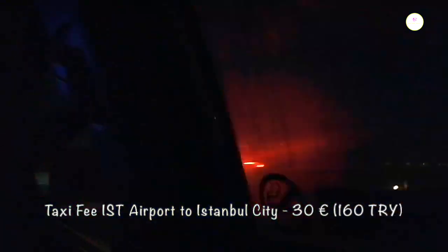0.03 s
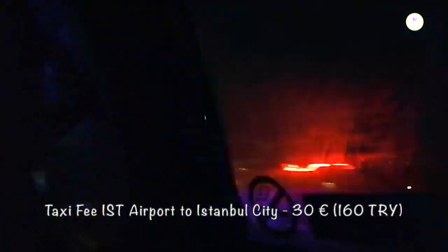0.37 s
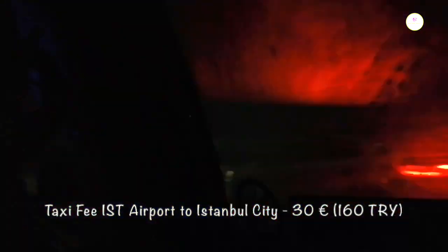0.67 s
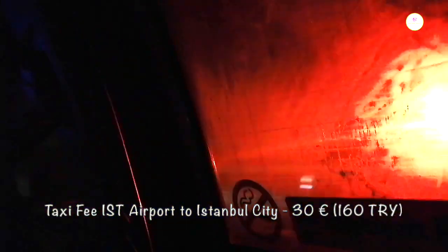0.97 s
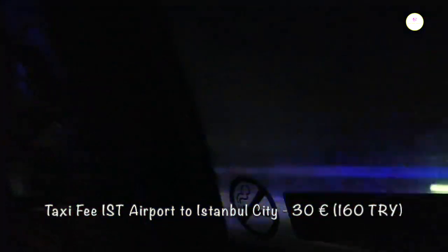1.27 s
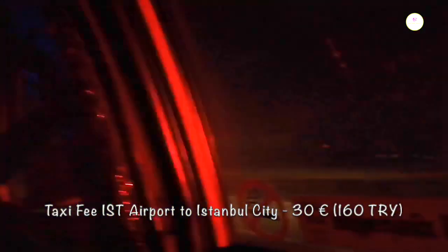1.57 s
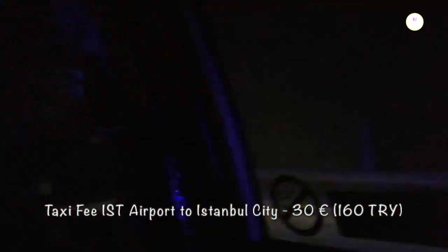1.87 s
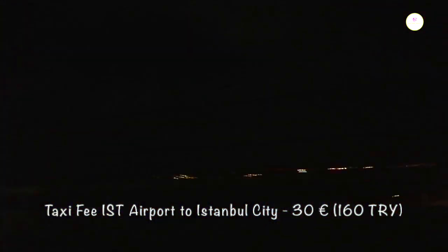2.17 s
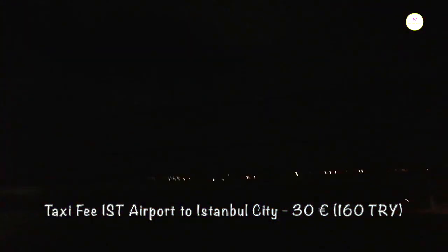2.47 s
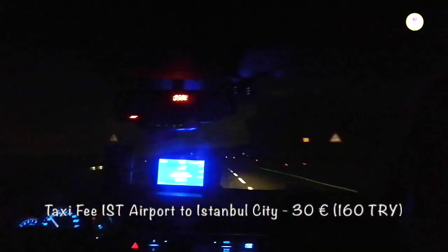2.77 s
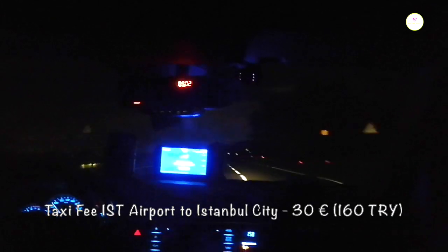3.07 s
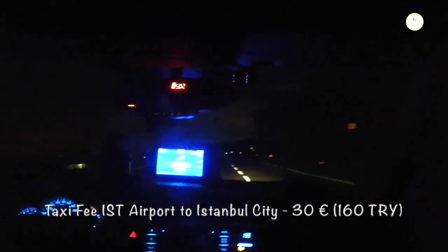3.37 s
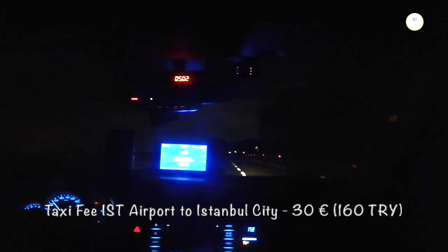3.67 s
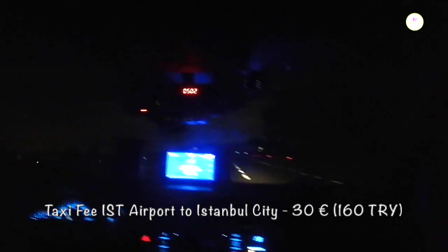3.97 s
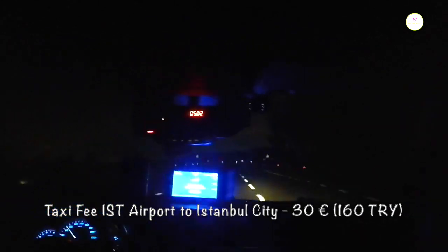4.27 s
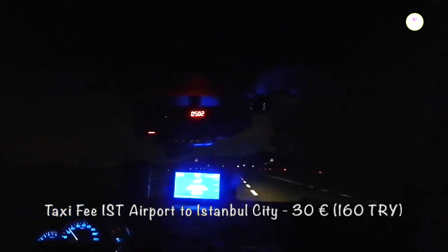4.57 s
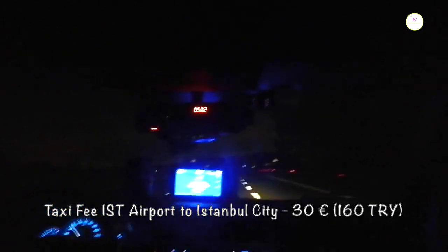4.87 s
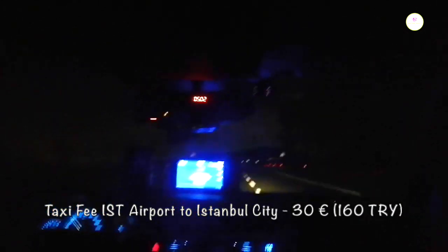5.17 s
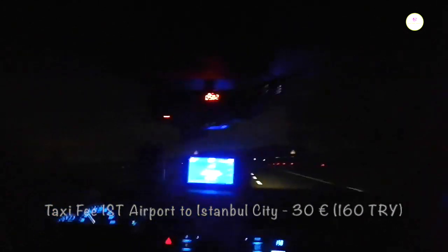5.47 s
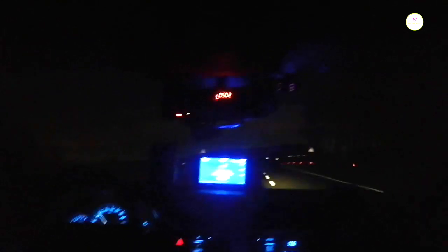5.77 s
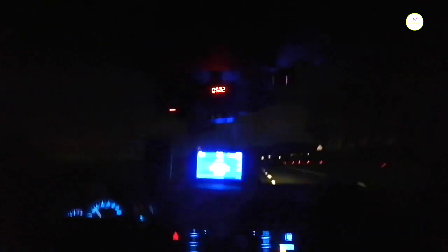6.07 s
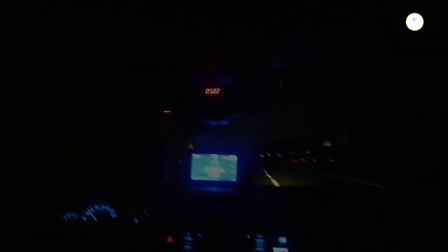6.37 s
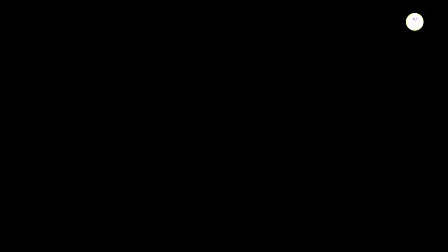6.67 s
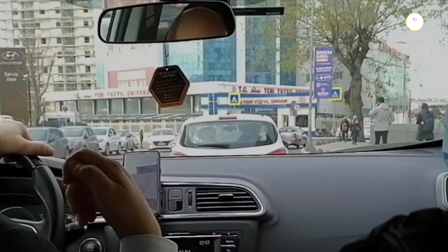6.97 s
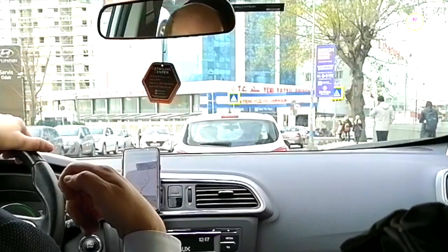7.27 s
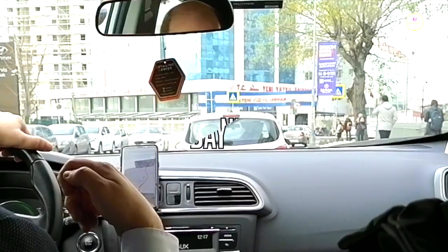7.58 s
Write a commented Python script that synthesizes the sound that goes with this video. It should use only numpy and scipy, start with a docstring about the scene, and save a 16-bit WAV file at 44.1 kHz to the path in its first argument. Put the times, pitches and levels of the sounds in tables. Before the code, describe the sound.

Inside a taxi cruising on a motorway, a low engine boom, road rumble and tyre roar run steadily, with small plastic ticks and faint rustles close by. The microphone starts beside a side window, where wind briefly rushes along the door seal. With two dry clicks it turns forward and the tyres sound duller. Gusts make a window gap sing faintly, then everything fades out.

```python
"""Inside a taxi cruising on a motorway at night. From the start the engine booms, the road rumbles
through the body and the tyres roar, with small plastic ticks and rustles close by. The microphone is
first by a side window, where wind rushes along the door seal at about 2 s. At 2.7 s, with two dry
clicks, it turns to face the dashboard and the tyres sound duller. Side gusts then make a window gap
sing faintly. From 6.5 s the sound fades out."""
import sys
import numpy as np
from scipy.fft import rfft, irfft, next_fast_len
from scipy.io import wavfile
from scipy.ndimage import uniform_filter1d, minimum_filter1d, map_coordinates

SR = 44100
rng = np.random.default_rng(int(sys.argv[2]) if len(sys.argv) > 2 else 0)


def put_to_file(sound):
    """Save the sound as 16-bit audio at rate SR, in the file named by the first command-line argument."""
    columns = np.atleast_2d(sound).T  # one column per channel
    safe = np.clip(columns, -1, 1)
    whole_steps = np.round(safe * 32767)
    wavfile.write(sys.argv[1], SR, whole_steps.astype(np.int16))


N = 340881

TURN_S, FADE_START_S = 2.70, 6.528
# How alike left and right sound by the window: pitch_hz, likeness (1 the same, -1 opposite)
LIKENESS_SIDE = [(60, 0.99), (160, 0.93), (350, -0.8), (520, 0.43), (680, .55), (950, 0.47), (1300, -.4),
                 (1800, -0.32), (2500, -0.1), (3200, -0.051), (5000, 0.45)]
# The same when facing forward: pitch_hz, likeness
LIKENESS_FRONT = [(60, 0.96), (130, 0.91), (290, 0.86), (600, 0.44), (800, 0), (1050, -0.4), (1600, -.4),
                  (2400, 0.47), (3400, -0.096), (5000, 0.13)]


def engine(main_waver_db=1.66, other_waver_db=3, level_db=-0.17):
    """The firing cylinders boom in the cabin as a few wavering tones that follow the load."""
    # How fast the cylinders fire: time_s, rate_hz
    firing_rate = [(0, 68.64), (.5, 66.96), (2.65, 68.75), (2.8, 71.77), (6.9, 70.6)]
    # The boom as the engine works more or less hard: time_s, level_db
    boom_levels = [(0, -19), (.2, -13.5), (.8, -18), (1.2, -13.5), (2.0, -16), (2.25, -19), (2.75, -19.5),
                   (3.2, -16), (4.05, -19.5), (4.5, -13.5), (4.95, -17.5), (5.85, -17), (6.5, -18)]
    # The engine's tones: multiple (of the firing rate), side_level_db, front_level_db
    tones = [(.5, -7.5, -19.5), (1, 0, 0.5), (2, -10, -12.5), (3, -25, -22.5), (3.5, -30.5, -23),
             (4, -35.5, -26)]
    phase = 2 * np.pi * np.cumsum(curves(firing_rate)[0]) / SR
    boom_db, = curves(boom_levels)
    front = facing_forward()
    hum = np.zeros(N)
    for multiple, side_db, front_db in tones:
        db = side_db + front * (front_db - side_db)
        waver_db = main_waver_db if multiple == 1 else other_waver_db
        drift = rng.uniform(0, 2 * np.pi) + 0.19 * multiple * wobble(5)
        hum += amp(db + waver_db * wobble(7)) * np.sqrt(2) * np.sin(multiple * phase + drift)
    return filtered(hum * amp(boom_db + level_db), balance)


def road(shake_db=1.5, drone_db=0.47, cabin_db=-7, waver_db=1.0, dip_length_s=0.16):
    """Uneven asphalt shakes the body, makes its panels drone and rings the cabin air; dips heave it."""
    # How rough the asphalt is: time_s, shake_level_db, drone_level_db
    roughness = [(0, -24, -18), (1, -20.5, -18.5), (2.6, -22.5, -17), (2.8, -19, -20), (3.45, -20, -17.5),
                 (3.95, -23, -20.5), (4.7, -21, -19), (5.45, -17.5, -22), (6.5, -22.5, -22.5)]
    # Dips in the road: middle_s, level_db
    dips = [(.84, -18.5), (1.73, -12.5), (1.98, -16.5), (2.33, -14), (4.85, -16.5), (5.47, -16)]
    # The deep shake of the body: pitch_hz, level_db
    shake_colour = [(10, -21), (18, -5.5), (27, -8.5), (34, -2), (40, -8.5), (50, -1), (58, -4.5),
                    (66, -8.5)]
    # The drone of the panels: pitch_hz, level_db
    drone_colour = [(50, -35), (68, -5), (85, 3), (100, -1), (112, -3.5), (125, -2.5), (160, -4.5),
                    (192, -12.5), (225, -11.5), (255, -14), (290, -15.5), (370, -22.5), (480, -31),
                    (700, -60)]
    # Booms of the air in the cabin and in the tyres: pitch_hz, width_hz, level_db
    air_booms = [(137.35, 8.5, -2.5), (212.9, 6.8, -12.5)]
    body_db, panel_db = curves(roughness)
    heave = sum(amp(db) * swell(s, dip_length_s) for s, db in dips)
    shake = np.hypot(amp(body_db), heave) * amp(shake_db) * noise(colour(shake_colour))
    drone = amp(drone_db) * noise(colour(drone_colour))
    cabin = amp(cabin_db) * noise(resonances(air_booms))
    return shake + amp(panel_db + waver_db * wobble(22)) * (drone + cabin)


def tyres(level_db=-40, side_db=0.45, front_db=2.5, glass_db=-4.5, sway_db=0.67, grain_db=0.83):
    """Rolling tyres roar: bright and ringing beside the glass, duller facing forward."""
    # The roar by the window: pitch_hz, level_db
    side_colour = [(220, -29.5), (380, -4.5), (515, -7), (647, -5.5), (836, -7.5), (962, -6.5),
                   (1090, -12.5), (1290, -7.5), (1900, -13.5), (2470, -46.5), (4180, -120)]
    # The roar facing forward: pitch_hz, level_db
    front_colour = [(220, -27), (380, -7), (471, -1.5), (605, -9), (660, -3.5), (792, -9.5), (906, -9),
                    (1110, -15.5), (1210, -13), (1540, -19), (1750, -16.5), (1900, -21), (2470, -49),
                    (4180, -120)]
    # Where the window glass rings: pitch_hz, width_hz, level_db
    glass_rings = [(645, 40, 0.5), (975, 100, -1.5), (1300, 75, -1.5), (1529, 83, -1.5), (2246, 160, -12.5)]
    roar_db = level_db + sway_db * wobble(5.3)
    side = amp(side_db) * noise(colour(side_colour), LIKENESS_SIDE)
    side += amp(glass_db) * noise(resonances(glass_rings), LIKENESS_SIDE)
    front = amp(front_db) * noise(colour(front_colour))
    share = facing_forward()
    roar = np.sqrt(1 - share) * side + np.sqrt(share) * front
    return amp(roar_db + grain_db * wobble(25)) * roar


def wind(level_db=-1, eddy_db=0.77):
    """Air streams over the body, and side gusts make a window gap sing faintly."""
    # How strong the stream of air is: time_s, level_db
    air_levels = [(.1, -51.5), (.55, -48), (1.05, -48), (1.6, -50), (4.2, -52.7), (5.25, -51), (6.3, -49.5)]
    # The sound of that stream: pitch_hz, level_db
    air_colour = [(1400, -17.5), (1650, -9), (1790, 0.5), (1950, -5.5), (2100, 1), (2350, -3), (2550, -5),
                  (2800, -8), (3050, -8), (3400, -15), (3800, -21.5), (4400, -30)]
    # Side gusts: middle_s, length_s, level_db
    gusts = [(3.33, 0.33, -52), (3.98, .2, -51.5), (4.95, 0.27, -50.5)]
    # Where the gap sings: pitch_hz, width_hz, level_db
    gap_rings = [(1770, 70, 0), (2200, 370, -11)]
    air_db, = curves(air_levels)
    stream = amp(air_db + level_db + eddy_db * wobble(12)) * noise(colour(air_colour))
    blowing = sum(amp(db) * swell(s, length_s) for s, length_s, db in gusts)
    return stream + blowing * noise(resonances(gap_rings))


def door_seal(start_s=2.06, rise_s=0.016, hold_s=0.59, level_db=-39, flutter_db=1.5):
    """Wind rushes along the door seal for a moment, fluttering and weakening, then dies away."""
    # Where the air rings at the seal: pitch_hz, width_hz, level_db
    seal_rings = [(1477, 140, 2.5), (1774, 49, -5), (2210, 370, -3.5), (2490, 150, -14), (3020, 720, -14.5)]
    rush = np.zeros((2, N))
    for hz, width_hz, db in seal_rings:
        flutter = amp(db + flutter_db * wobble(20))
        rush += flutter * noise(resonances([(hz, width_hz, 0)]), LIKENESS_SIDE)
    sag_db = 3.5 * since(start_s)
    release_db = 60 * np.maximum(since(start_s + hold_s), 0)
    return ramp(start_s, rise_s) * amp(level_db - sag_db - release_db) * unit(rush)


def ticks(level_db=-5.5, rise_s=0.0011, chatter_db=2.5, left_shift_db=2):
    """Plastic sticks and slips: each tick or scrape is a short, chattering burst."""
    # Ticks and scrapes: start_s, level_db, decay_s (time to fall 60 dB), left_minus_right_db
    clear_ticks = [(.233, -46, .08, -2), (1.3953, -26.5, .022, 3), (1.806, -45, .04, -1.5),
                   (1.849, -31, .07, -6), (1.871, -43, .04, -2), (1.898, -42.5, .02, -5.5),
                   (2.776, -40, 0.027, -2.5), (2.934, -42.5, 0.059, -3), (3.128, -43.5, 0.056, -3),
                   (3.4619, -39, .025, -10.5), (3.519, -43, .03, -3.5), (3.547, -45.5, .04, -5.5),
                   (3.848, -47, .04, -2), (4.702, -43.5, .04, -2.5), (4.865, -45.5, .06, -8),
                   (5.091, -42.5, .03, -5), (5.427, -44, .04, -2.5), (5.993, -42.5, .06, -4),
                   (6.016, -44.5, 0.092, -1), (6.160, -44.5, .06, -3.5), (6.258, -46, .08, -3),
                   (6.453, -45.5, .05, -4), (6.579, -41.5, .035, -3)]
    faint_ticks = [(s, -51, .04, -2) for s in rng.uniform(TURN_S, FADE_START_S, size=8)]
    t = np.arange(SR // 4) / SR
    loudness = np.zeros((2, N))
    for start_s, db, decay_s, left_db in [*clear_ticks, *faint_ticks]:
        burst = amp(db) * np.exp(-np.log(1000) * t / decay_s) * (1 - np.exp(-t / rise_s))
        sides = amp((left_db + left_shift_db) * np.array([[.5], [-.5]]))
        loudness[:, round(start_s * SR):][:, :len(t)] += sides * burst
    return loudness * amp(level_db + chatter_db * wobble(500)) * plastic_noise()


def clicks(level_db=2):
    """Each hard contact is a single push with no ring: a dry click."""
    # The contacts: start_s, level_db, left_minus_right_db
    contacts = [(2.713, -27, -6), (2.857, -23.5, -17.5)]
    # The sound of one click: pitch_hz, level_db
    click_colour = [(2200, -5), (3200, 1.5), (4500, 0), (7000, -2), (10000, -5), (15000, -7.5)]
    pushes = np.zeros((2, N))
    for start_s, db, left_db in contacts:
        pushes[:, round(start_s * SR)] = amp(db + level_db) * amp([left_db / 2, -left_db / 2])
    return filtered(pushes, colour(click_colour))


def rustle(side_db=-63.5, front_db=-66, hiss_db=0.85, flicker_db=1, creak_db=-7, uneven_db=4.0):
    """A faint, close hiss with fine creaks in it swells whenever something brushes on plastic."""
    # Brushes on plastic: start_s, length_s, level_db
    rubs = [(0.207, .3, -59), (0.453, .4, -64), (1.246, .25, -60.5), (1.578, .4, -63.5),
            (1.815, .25, -57.5), (2.153, .35, -57), (2.332, .3, -61), (4.811, .15, -62.5), (6.195, .2, -60)]
    steady = amp(side_db + facing_forward() * (front_db - side_db))
    # Each rub swells for a fifth of its length and dies away over the rest.
    rubbing = sum(amp(db) * np.interp(since(s) / length_s, [0, .2, 1], [0, 1, 0])
                  for s, length_s, db in rubs)
    # The sound of the hiss: pitch_hz, level_db
    hiss_colour = [(2240, -34.5), (3800, -6.5), (4030, -14), (4250, -8), (5160, -2.5), (6080, -5),
                   (6920, -2), (7210, -2.5), (7830, -9), (8710, -7.5), (11200, -12), (14600, -11),
                   (15500, -18)]
    hiss = amp(hiss_db + flicker_db * wobble(30)) * noise(colour(hiss_colour))
    creaks = unit(amp(uneven_db * (wobble(22) + wobble(160))) * plastic_noise())
    return np.hypot(steady, rubbing) * (hiss + amp(creak_db) * creaks)


def plastic_noise():
    """The bright noise that ticks and creaks are made of."""
    # The sound of slipping plastic: pitch_hz, level_db
    plastic_colour = [(2500, -29.5), (4500, -19), (5700, -9.5), (6800, 1.5), (7700, -6.5), (8900, -1.5),
                      (10500, -10.5), (15000, -13.5)]
    return noise(colour(plastic_colour))


def facing_forward(turn_length_s=0.069):
    """The microphone's turn: 0 by the window, 1 facing the dashboard."""
    return ramp(TURN_S, turn_length_s)


def balance(hz):
    """The right microphone hears most of the cabin louder; each opening has its own treble ring."""
    # Which side is louder: pitch_hz, left_minus_right_db
    left_lean = [(60, -4), (120, -6.5), (200, -4.5), (380, -0.6), (700, -1.5), (1290, -5.5), (2380, -7.5),
                 (3200, -8.5), (4400, -7), (6000, -8.5), (7000, -12.5), (7900, -1), (8900, 6.5),
                 (10500, -1.5), (15000, 0)]
    return amp(np.outer([.5, -.5], along(left_lean, hz)))


def noise(response, likeness=LIKENESS_FRONT):
    """Stereo noise of a standard strength, shaped by a filter and by how alike its two sides are."""
    def shared_and_opposite(hz):
        angle = np.arccos(np.clip(along(likeness, hz), -1, 1)) / 2
        return response(hz) * [np.cos(angle), np.sin(angle)]
    shared, opposite = filtered(rng.standard_normal((2, N)), shared_and_opposite)
    return unit(filtered(np.array([shared + opposite, shared - opposite]), balance))


def colour(points):
    """A filter through (pitch_hz, level_db) points, falling steeply beyond its ends."""
    low_hz, high_hz = points[0][0], points[-1][0]
    return lambda hz: (amp(along(points, hz)) * np.minimum(hz / low_hz, 1) ** 2
                       * (high_hz / np.maximum(hz, high_hz)) ** 8)


def resonances(rings):
    """A filter that lets sound through around a few ringing pitches."""
    return lambda hz: sum(amp(db) / (1 + ((hz - pitch_hz) / width_hz) ** 2) ** 2
                          for pitch_hz, width_hz, db in rings)


def filtered(x, response):
    """Turn each pitch in x up or down by response(hz)."""
    size = next_fast_len(N + SR // 2)
    return irfft(rfft(x, size) * response(np.fft.rfftfreq(size, 1 / SR)), size)[..., :N]


def along(points, hz):
    """Read between (pitch_hz, value) points on a log pitch scale."""
    pitches, values = np.transpose(points)
    return np.interp(np.log(hz + 1), np.log(pitches + 1), values)


def curves(rows):
    """One value per sample for each column after the time."""
    times, *columns = np.transpose(rows)
    return [np.interp(since(0), times, column) for column in columns]


def wobble(rate):
    """A smooth curve through `rate` random values a second."""
    return map_coordinates(rng.standard_normal(int(N * rate / SR) + 4), [np.arange(N) * rate / SR])


def amp(db):
    """Decibels to gain."""
    return 10 ** (np.asarray(db) / 20)


def unit(x):
    """Scale so that the average of the channels has strength (rms) 1."""
    return x / np.sqrt(np.mean(np.atleast_2d(x).mean(0) ** 2) + 1e-20)


def since(s):
    """Seconds since a moment, for each sample."""
    return np.arange(N) / SR - s


def ramp(start_s, length_s):
    """A straight rise from 0 to 1."""
    return np.clip(since(start_s) / length_s, 0, 1)


def swell(middle_s, length_s):
    """A smooth rise to 1 and fall to 0."""
    return np.cos(np.pi * np.clip(since(middle_s) / length_s, -.5, .5))


def limited(x, ceiling=.84):
    """Ease the volume down around the largest swings."""
    needed = ceiling / np.maximum(np.abs(x).max(0), ceiling)
    held = minimum_filter1d(needed, size=800)
    return x * uniform_filter1d(uniform_filter1d(held, size=400), size=400)


def scene():
    """Everything heard in the cabin."""
    return engine() + road() + tyres() + wind() + door_seal() + ticks() + clicks() + rustle()


def record(dry, gain_db=-1.71, fade_db_per_s=37.5, stop_s=6.955, top_hz=15500):
    """Peaks are held down, the sound fades out and stops, and the highest treble is cut."""
    fade = amp(-fade_db_per_s * np.maximum(since(FADE_START_S), 0))
    stop = 1 - ramp(stop_s, length_s=0.011)
    return filtered(limited(amp(gain_db) * dry) * fade * stop, lambda hz: hz < top_hz)


dry = scene()
out = record(dry)
put_to_file(out)
```